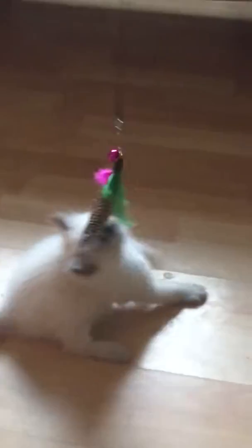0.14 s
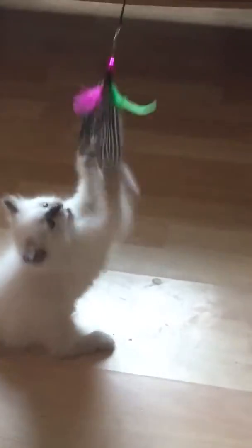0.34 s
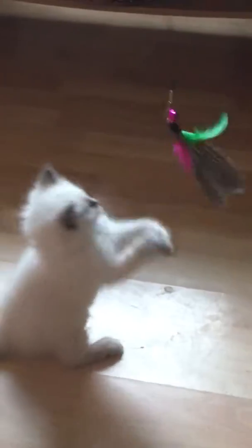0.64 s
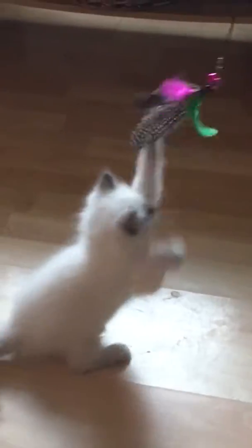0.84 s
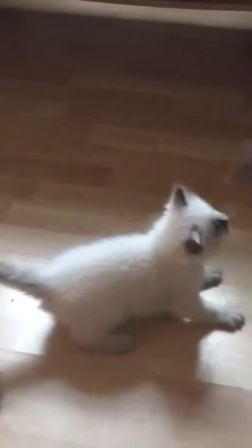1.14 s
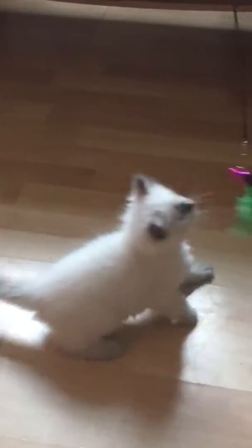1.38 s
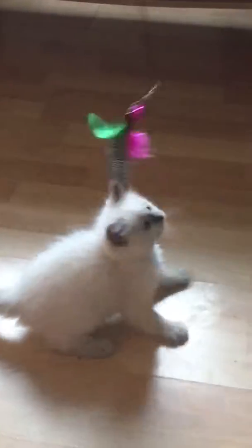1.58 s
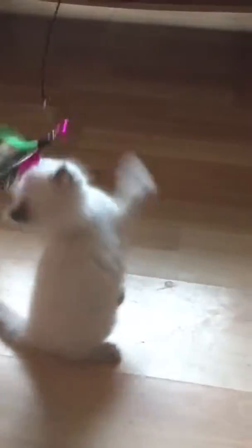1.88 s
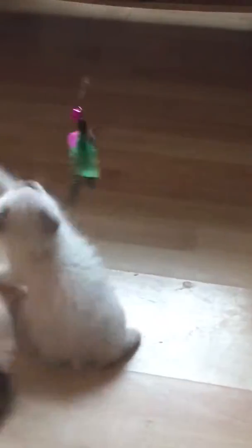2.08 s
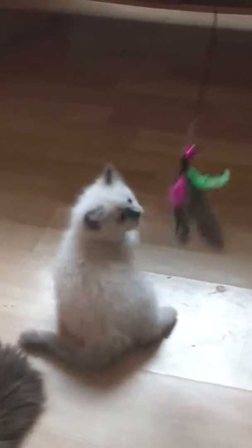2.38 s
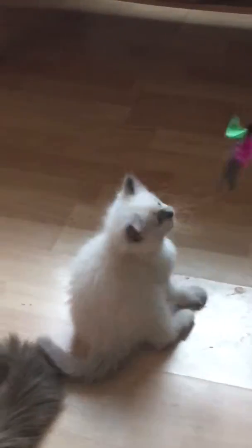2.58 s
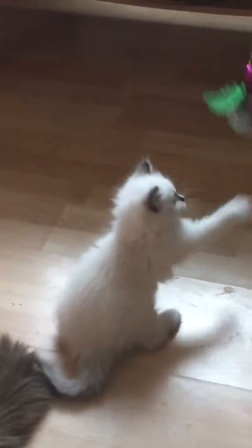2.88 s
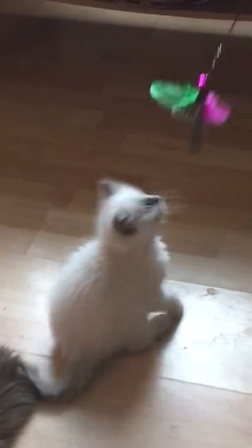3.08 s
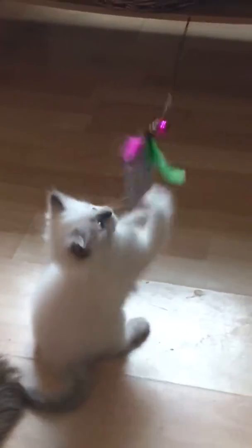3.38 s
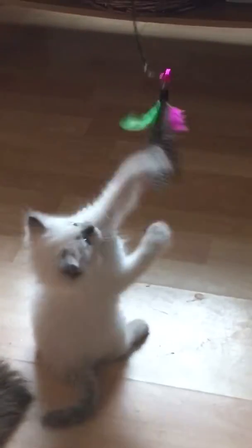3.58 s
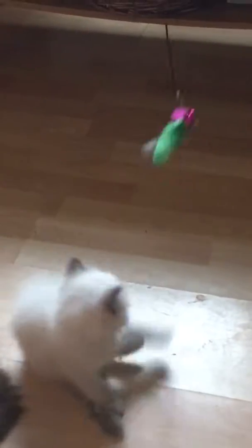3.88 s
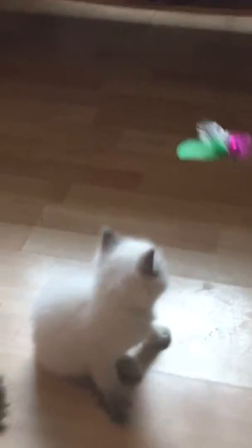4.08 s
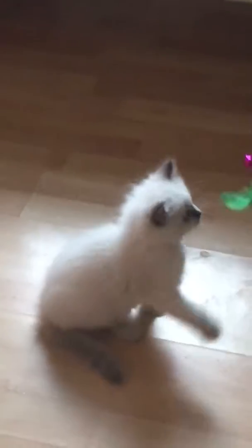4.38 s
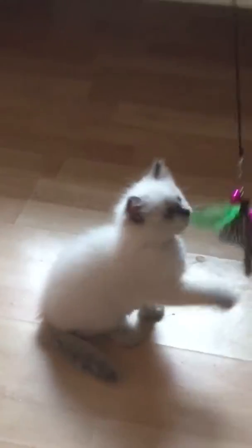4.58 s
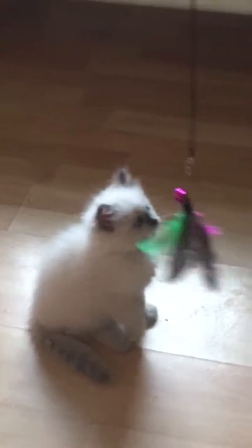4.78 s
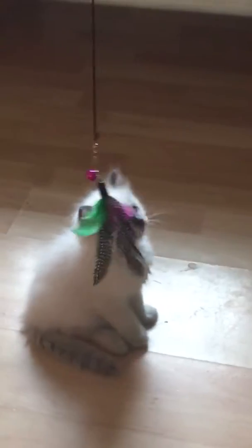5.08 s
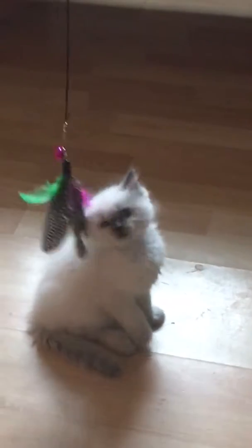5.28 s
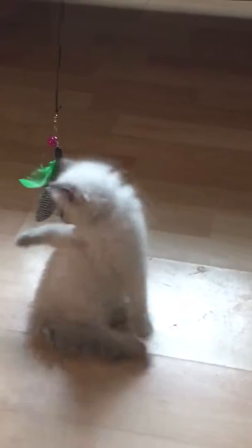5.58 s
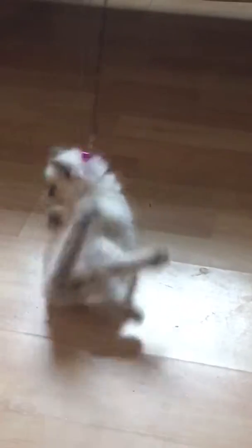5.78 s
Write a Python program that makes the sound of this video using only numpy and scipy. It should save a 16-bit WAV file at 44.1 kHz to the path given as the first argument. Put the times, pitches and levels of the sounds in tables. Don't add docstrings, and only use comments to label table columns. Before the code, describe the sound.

Thin, bright jingles from a small bell toy, feather rustles and paw knocks on a hollow wooden floor, ending in rapid claw tapping.

```python
import sys
import numpy as np
from scipy import signal
from scipy.fft import rfft, irfft, next_fast_len
from scipy.io import wavfile

SR = 44100
rng = np.random.default_rng(int(sys.argv[2]) if len(sys.argv) > 2 else 0)


def wav_out(sig):
    wavfile.write(sys.argv[1], SR, np.round(np.clip(np.atleast_2d(sig).T, -1, 1) * 32767).astype(np.int16))


def invert_db(x):
    u = np.asarray(x, float) / 20
    return 10 ** u


N = 261954

# (frequency [Hz], density [dB per Hz])
AIR_SPECTRUM = [(20, -17.5), (35, -20), (53, 2.5), (75, -6.5), (100, -3), (250, -13.5), (600, -20),
                (1250, -22), (2500, -24), (4000, -26.5), (7500, -32), (12000, -26), (15800, -23.5)]
# (centre [s], half width [s], level [dB])
STIRS = [
    (.36, 0.28, -84),
    (1.2, 0.25, -74.5),
    (2.33, 0.27, -72),
    (3.39, 0.34, -83),
    (4.33, 0.39, -80),
]
# (frequency [Hz], T60 [s])
ROOM_T60 = [(200, 0.24), (1000, 0.33), (5000, 0.35), (8000, 0.24), (15000, 0.17)]
# (frequency [Hz], gain [dB])
MIC_RESPONSE = [(8500, -0.5), (9300, -1.5), (10300, -4.5), (11500, -0.5), (14000, -3), (15700, -1)]
# (time [s], peak [dB], thud re peak [dB], slap re peak [dB], board pitch at the spot [Hz])
PAW_LANDINGS = [(0.407, -40.5, -15.5, -29, 880), (0.418, -62, 8.5, -20, 500), (0.469, -66, 7.5, -20, 500),
                (0.549, -69.5, 11, 6, 509), (0.855, -51.5, -9.5, -7, 530), (1.1653, -31.5, -28, -6, 900),
                (1.171, -41, -19, -21, 595), (1.1828, -28, -30, -19, 600), (1.196, -34, -28, -14, 600),
                (1.211, -47, -30, -22, 560), (1.219, -50, -28, -18, 623), (1.235, -46, -17, -19, 640),
                (1.23, -60.5, 6, 8, 581), (1.25, -57.5, 1, 11, 533), (1.392, -57, 1.5, -7, 546),
                (1.414, -64, 8.5, 7.5, 587), (1.656, -42, -27, -11, 710), (1.66, -40.5, -24, -18, 510),
                (1.666, -45, -12, -11, 740), (1.671, -59, -33, -20, 535), (1.722, -66.5, 8, -6.5, 511),
                (1.735, -75, 9, -20, 500), (1.764, -60, 0, -21.5, 500), (1.786, -44, -11, 0, 815),
                (1.8, -53.5, -4, -10, 600), (1.811, -60.5, 5, -6, 514), (1.823, -60, 1, -20, 500),
                (1.973, -46, -23, -29, 1120), (2.135, -31, -35, -9.5, 630), (2.142, -35, -16, -34, 604),
                (2.145, -32, -24, -19, 670), (2.151, -40, -36, -30, 590), (2.176, -54, -24, -22, 560),
                (2.197, -52, -19, -16, 620), (2.248, -72, 3, -18, 500), (2.268, -48, -29, -7, 700),
                (3.916, -49, -19, -25, 724)]
# (frequency [Hz], level [dB], T60 [s])
BOARD_MODES = [(352, 7.5, 0.039), (530, -1.5, 0.05), (629, -0.5, 0.049), (744, -1, 0.023),
               (930, 0.5, 0.029), (1214, 0, 0.014), (1490, -5, 0.011), (2050, -9, 0.012)]
# (frequency [Hz], level [dB], T60 [s])
THUD_MODES = [(120, -3, 0.028), (210, 3, 0.021), (255, -2, 0.07)]
# (time [s], level [dB])
SCUFFS = [(0.031, -63.5), (0.0658, -52.5), (0.261, -58), (0.321, -58), (0.74, -50.5), (0.882, -55),
          (0.939, -54), (0.943, -55), (1.0369, -50.5), (0.066, -58), (1.105, -52.5), (1.183, -46.5),
          (1.388, -55), (1.567, -56), (1.666, -54), (1.67, -59), (1.747, -56), (1.785, -53), (1.884, -57),
          (2.141, -43), (2.059, -55.5), (2.29, -51), (2.4105, -52.5), (2.84, -51), (2.846, -67),
          (3.257, -59), (3.372, -53.5), (3.657, -61)]
# (time [s], hold [s], level [dB])
SLIDES = [
    (0.4072, 0.0027, -48.5),
    (0.416, .008, -69),
    (0.423, 0.012, -57),
    (0.438, 0.021, -54),
    (0.473, 0.0036, -63),
    (0.481, 0.02, -67),
    (0.504, 0.014, -61.5),
]
# (frequency [Hz], level [dB], T60 [s])
SKID_MODES = [(980, -20, 0.006), (2070, -9.5, 0.015), (2460, 4.5, 0.0058), (3100, 1, 0.002),
              (4540, -9, 0.0033), (5800, -3.5, 0.0021)]
# (time [s], level [dB])
CLAW_TICKS = [(5.292, -40), (5.2974, -48), (5.3144, -44), (5.333, -35.5), (5.359, -40), (5.3644, -45),
              (5.383, -36), (5.4134, -35.5), (5.428, -44), (5.445, -39), (5.461, -41), (5.478, -43),
              (5.4824, -51), (5.5004, -36), (5.5293, -34), (5.5404, -53), (5.553, -36), (5.5923, -43),
              (5.6544, -59), (5.696, -45), (5.7024, -58), (5.7314, -39), (5.7544, -39), (5.784, -31.5),
              (5.8142, -35.5)]
# (time [s], level [dB])
SHAKE = [(0, -75.5), (.21, -81.5), (.56, -69), (.97, -79.5), (1.07, -64), (1.22, -78.5), (1.62, -79),
         (1.8, -65.5), (2.02, -79), (2.17, -66), (2.27, -80), (3.04, -83), (3.34, -73.5), (3.75, -78.5),
         (4.33, -79), (5.1, -84.5), (5.39, -74.5), (5.94, -79.5)]
# (frequency [Hz], level [dB], T60 [s])
LINK_MODES = [(4900, 2, 0.0019), (5300, -2, 0.0036), (6130, 0, 0.0025), (7470, -3.5, 0.0048)]
# (time [s], peak [dB], link clink re peak [dB], tick re peak [dB])
HARD_STRIKES = [(0.581, -34, -29, -14), (0.5866, -42.5, -3, 0.5), (0.74, -33.5, -10.5, 0.5),
                (0.825, -40, -34, -28), (1.047, -40, -27, -28), (1.5665, -39.5, -18, 4),
                (1.7556, -32.5, -20, -3.5), (1.7607, -32, -21, -23), (1.77, -38.5, -10, -8),
                (1.777, -33, -16, -4), (1.795, -33, -23, -20), (1.8475, -23, -22, -13),
                (1.857, -19, -22, -18), (1.8717, -32, -22, -3), (1.9399, -21, -23, -16.5),
                (2.13, -41, -16, -9), (2.301, -38, -27, -12), (2.427, -36.5, -11, -1),
                (2.4388, -24.5, -47, -16), (2.841, -36, -5.5, -0.5), (2.877, -33.5, -16, -10),
                (3.153, -35.5, -20, -14.5), (3.4228, -35, -13, -13), (4.2053, -29, -23, -11.5),
                (4.2325, -29, -10.5, -6.5), (4.2403, -25.5, -41, -36), (4.2653, -26.5, -21, -11.5),
                (4.2946, -21, -22, -13), (4.336, -36, -33, -7), (4.3688, -36.5, -17, -12),
                (4.724, -37, -17, -16)]
# (time [s], peak [dB], clatter re peak [dB], free ring [s])
SOFT_STRIKES = [(0.023, -58, -15, .006), (.4117, -55, -20, 0.032), (0.719, -52, -35, 0.014),
                (1.0384, -43, -11, .008), (1.078, -46, -10, 0.0051), (1.128, -39, -27, 0.0018),
                (1.153, -49, -7, 0.0052), (1.587, -44, -34, 0.0052), (1.635, -45.5, -35, 0.012),
                (1.7843, -33, -27, 0.01), (2.0122, -48, -37, 0.0067), (2.254, -51, -13, 0.0091),
                (2.3258, -40.5, -12, 0.013), (2.363, -44, -15, .005), (3.1036, -44.5, -20, 0.017),
                (3.199, -47, -13, 0.0067), (3.224, -43, -14, 0.0053), (3.4411, -41, -18, 0.002),
                (3.521, -41.5, -11, 0.0043), (3.6538, -43, -14.5, 0.04), (3.7031, -47, -26, 0.083),
                (3.7813, -41.5, -13, 0.0023), (3.848, -49, -22, 0.0072), (4.376, -40, -21, 0.0069),
                (4.6044, -46, -20, 0.026), (4.659, -45.5, -18, 0.0066), (4.744, -44.5, -15, 0.0083),
                (5.1835, -42, -19, 0.0057), (5.899, -62, -17, 0.0065), (5.92, -52, -28, 0.0045)]
# (time [s], peak [dB], upper mode re peak [dB], clatter re peak [dB])
LIP_STRIKES = [(0.1375, -47.5, -4, -7), (0.1919, -36, -4, -15.5), (0.2, -39, -16, -12),
               (0.568, -51, 10, -20), (0.7339, -33, -8, -29), (0.7505, -35, 3, -17), (0.78, -41, 2, -11),
               (0.965, -47.5, 2, -17), (1.092, -44.5, -4, -6), (1.1142, -34, -8, -27),
               (1.139, -37, -12, -28), (1.7475, -31.5, -9, -12), (1.93, -37, -5, -12),
               (2.188, -49.5, -11, -12), (2.615, -53, -12, -7.5), (2.6391, -48.5, -7, -9.5),
               (2.9246, -35.5, -4, -19), (3.244, -49, -11, -7), (3.258, -51, -6, -3.5),
               (3.2709, -37, -6, -12), (3.379, -37, -15, -7), (3.497, -51, -8, -14), (3.538, -37, -8, -21),
               (3.8608, -38, -6, -9), (4.1833, -46.5, -12, -10), (4.272, -49, -11, -25),
               (4.712, -43.5, -2, -18), (5.867, -58, -15, -11), (5.9271, -49, -3, -15)]
# (time [s], peak [dB], link clink re peak [dB], tick re peak [dB])
TUGS = [(0.07, -64, -25, 17), (.245, -56, -5, 9), (0.32, -66, -8, 16), (0.471, -62.5, 0, 18.5),
        (0.51, -60.5, -19, 20.5), (0.554, -53, -6, 4), (0.517, -63, -12, 19), (0.684, -60.5, 7, -1),
        (0.691, -60, -1, 15), (0.8821, -61.5, 9, 17), (0.933, -62, 8, 14), (0.9567, -47.5, -3.5, 6),
        (1.1048, -38, -4, -0.5), (1.167, -57, -18, 13), (1.186, -55, 12, 18), (1.373, -70.5, 8, 15),
        (1.485, -65.5, 3.5, 14.5), (1.553, -58, -1, 4), (2.0599, -53.5, 5, 13), (2.088, -44, 0.5, 13.5),
        (2.097, -58, 1, 4), (2.097, -64, -4, 7), (2.142, -62.5, -11, 19), (2.298, -56, -4, 4),
        (.26, -61, 2, 11), (0.308, -71, 6, -2), (2.264, -53.5, -6, -12), (2.29, -38, -5, 5),
        (2.411, -43.5, -10, 7.5), (2.4205, -51, 2.5, 4), (2.424, -53, -1, 4), (2.434, -49, -10, 5),
        (2.4365, -60, -7, -6), (3.511, -60, -2, 8), (1.353, -73, 9, 4), (2.798, -58, -3, 5),
        (2.817, -63, 7, 9), (3.095, -72, 2, 8), (4.588, -62, 0, -4), (4.256, -58, -7, 14),
        (2.025, -70, -10, 10), (2.828, -68, -8, 10), (3.3632, -51.5, -3, 5), (3.3742, -40.5, -7, 5.5),
        (3.388, -45, -24, -5), (4.485, -65, -3, 14), (5.353, -58.5, -5, -2)]
# (time [s], peak [dB], free ring [s])
REBOUNDS = [(.76, -38, 0.0077), (.775, -48, 0.0035), (.7845, -36, 0.0036), (0.793, -42, .004),
            (.803, -40, 0.0072), (1.068, -42, .012), (1.087, -41, 0.0023), (1.1002, -41, 0.0034),
            (1.1205, -38, .005), (1.1317, -40, .006), (1.853, -34, .003), (1.865, -25, 0.0099),
            (1.879, -37, .004), (1.89, -40, 0.0073), (.965, -30, 0.0033), (2.314, -42, 0.0036),
            (2.335, -43, 0.0044), (2.485, -43, 0.025), (4.245, -34, .006), (4.277, -42, 0.006),
            (4.41, -49, 0.0056), (1.947, -35, .004), (1.956, -47, 0.0022), (2.455, -29.5, 0.004),
            (2.46, -41, 0.0027), (2.466, -41, 0.0034), (2.476, -39, 0.0022), (2.885, -37, .004),
            (2.902, -50, 0.0059), (3.386, -35, .002), (3.393, -47, 0.0016), (3.415, -42, 0.0044),
            (3.435, -40, 0.0023), (3.451, -47, 0.021), (3.546, -47, 0.0023), (4.218, -41, 0.0039),
            (4.255, -35, 0.0032), (4.304, -30, 0.0034), (4.31, -38, 0.0033), (4.32, -39, 0.0044),
            (4.329, -42, 0.0034)]
# (time [s], free ring [s])
FLIGHTS = [(.741, 0.011), (.7502, 0.009), (1.047, 0.02), (1.1146, .002), (1.127, .002), (1.139, 0.0038),
           (1.5666, .058), (1.794, 0.006), (1.8479, 0.0033), (1.8575, 0.0043), (1.8722, .004),
           (1.94, 0.0057), (2.427, 0.0018), (2.4388, 0.015), (2.841, 0.015), (2.8773, 0.0057),
           (2.9256, 0.014), (3.153, 0.0071), (3.2728, 0.036), (3.379, 0.0025), (3.538, 0.0045),
           (4.183, 0.01), (4.2053, .004), (4.2396, 0.005), (4.2648, 0.01), (4.2942, 0.007), (4.336, .005),
           (4.368, .006), (.192, 0.0036), (2.13, .015), (4.712, .012), (4.724, 0.01)]
# (time [s], frequency [Hz])
BELL_PITCH = [(.14, 7500), (.19, 7570), (.73, 7515), (.97, 7470), (1.05, 7518), (1.6, 7518), (1.79, 7478),
              (1.85, 7412), (1.94, 7462), (2.13, 7470), (2.33, 7588), (2.44, 7490), (2.64, 7590),
              (2.84, 7478), (2.93, 7572), (3.1, 7513), (4.23, 7465), (4.6, 7535)]
# (peak [dB], T60 [s])
FREE_T60 = [(-44, .22), (-34, .1), (-24, .06)]

AIR_DB, STILL_DB = -67, -83
BAND_LIMIT_HZ = 16000
FEET_WET_DB, RING_WET_DB = -5.5, -10
BITE_DB, BITE_S, SLIDE_FADE_DB_PER_S = 0.5, 0.0026, 900
ROLL_DB, ROLL_SETTLE_S, ROLL_FOLLOWS = -39, 0.018, 0.73
SHIVER_DB, SHIVER_S = -77.5, 0.026
JANGLE_DB, JANGLE_S, LINK_SPREAD_DB = -6, 0.0048, 3
LINK_DB, TICK_DB = 1, 8
HARD_UPPER_DB, SOFT_UPPER_DB, TUG_UPPER_DB = -30, -14, -3
FREE_RING_S, LIP_RING_S, RING_SPREAD = 0.0073, 0.0096, 0.042
DAMPED_DB, CARRIED_DB, SETTLE_S = -8.5, -13, 0.0007
SPLIT_HZ, SPLIT_DB = 48, -19.5
BELL_UPPER_HZ, UPPER_T60_S, BELL_T60_S = 8140, 0.15, 0.11


def rms_one(x):
    return x / np.sqrt(np.mean(x ** 2) + 1e-20)


def in_time(rows):
    s, *columns = np.transpose(rows)
    return [np.interp(np.arange(N) / SR, s, c) for c in columns]


def at_hz(points, hz):
    table_hz, values = np.transpose(points)
    return np.interp(np.log(hz + 1), np.log(table_hz), values)


def band(x, low_hz, high_hz):
    sos = signal.butter(2, [low_hz, min(high_hz, .45 * SR)], "band", fs=SR, output="sos")
    return signal.sosfilt(sos, x + 1e-18)


def linger(x, decay_s):
    return signal.lfilter([1], [1, -np.exp(-1 / (decay_s * SR))], x + 1e-18)


def ring(clicks, modes):
    out = 0
    for hz, db, t60_s in modes:
        r, w = invert_db(-60 / (t60_s * SR)), 2 * np.pi * hz / SR
        out = out + invert_db(db) * signal.lfilter([0, np.sin(w)], [1, -2 * r * np.cos(w), r * r], clicks + 1e-18)
    return out


def blows(times_s, db):
    out = np.zeros(N)
    at = np.round(np.asarray(times_s) * SR).astype(int)
    np.add.at(out, np.minimum(at, N - 1), invert_db(db))
    return out


def grains(per_s, spread_db):
    sizes = invert_db(spread_db * np.minimum(rng.exponential(1, N), 5))
    return sizes * rng.choice([-1, 1], N) * (rng.random(N) < per_s / SR)


def puff(clicks, low_hz, high_hz, decay_s):
    return linger(np.abs(clicks), decay_s) * rms_one(band(rng.standard_normal(N), low_hz, high_hz))


def drift(rate_hz):
    r = np.exp(-2 * np.pi * rate_hz / SR)
    return rms_one(signal.lfilter([1], [1, -2 * r, r * r], rng.standard_normal(N + SR))[SR:])


def air():
    hz = np.arange(N // 2 + 1) * SR / N
    noise = irfft(rfft(rng.standard_normal(N)) * invert_db(at_hz(AIR_SPECTRUM, hz)), N)
    return invert_db(AIR_DB) * rms_one(noise)


def stirring():
    t = np.arange(N) / SR
    swell = invert_db(STILL_DB) + sum(invert_db(db) * np.exp(-((t - s) / half_s) ** 2) for s, half_s, db in STIRS)
    low = rms_one(band(rng.standard_normal(N), 140, 304)) * invert_db(2.2 * drift(2.3))
    rumble = rms_one(band(rng.standard_normal(N), 35, 114)) * invert_db(-78.5 + 5.0 * drift(2.14))
    house_air = rms_one(band(rng.standard_normal(N), 260, 650))
    return rumble + swell * (invert_db(2.5) * low + invert_db(-2.5) * house_air)


def room(x):
    t, tail = np.arange(SR // 2) / SR, 0
    for hz in 125 * 2. ** np.arange(8):
        noise = band(rng.standard_normal(len(t)), hz / 2 ** .5, hz * 2 ** .5)
        tail = tail + noise * invert_db(-60 * t / at_hz(ROOM_T60, hz))
    tail = tail * np.clip((t - .004) / 0.00019, 0, 1)
    tail = tail / np.sqrt(np.sum(tail ** 2))
    size = next_fast_len(N + len(t))
    return irfft(rfft(x, size) * rfft(tail, size), size)[:N]


def paws():
    s, db, thud_db, slap_db, spot_hz = np.transpose(PAW_LANDINGS)
    board = 0
    for k, mode in enumerate(BOARD_MODES):
        near_db = -24 * np.log2(mode[0] / spot_hz) ** 2
        board = board + (-1) ** k * ring(blows(s - .001, db - 8.5 + near_db), [mode])
    thud = ring(band(blows(s - .001, db + thud_db + 2.0), 90, 530), THUD_MODES)
    slaps = puff(blows(s, db + slap_db - 4.0), 690, 2100, 0.0022)
    catches = blows(*np.transpose(SCUFFS))
    scuffs = invert_db(-1.5) * puff(catches, 1080, 7200, 0.0041) + invert_db(21.5) * band(catches, 2000, 4500)
    return band(board, 380, 3600) + thud + slaps + scuffs


def claw_skid():
    t, press = np.arange(N) / SR, 0
    for s, hold_s, db in SLIDES:
        age_s = np.maximum(t - s, 0)
        bite_db = BITE_DB * np.exp(-age_s / BITE_S)
        fade_db = SLIDE_FADE_DB_PER_S * np.maximum(age_s - hold_s, 0)
        press = press + (t > s) * invert_db(db + bite_db - fade_db)
    return press * rms_one(ring(grains(5000, 1.8), SKID_MODES))


def claw_ticks():
    s, db = np.transpose(CLAW_TICKS)
    taps = blows(s + .001, db)
    sharp = band(band(taps, 12000, 21000), 8600, 17000)
    return invert_db(12.5) * sharp + invert_db(-1.0) * band(taps, 3800, 7200)


def flight(s, usual_s):
    return next((free_s for at_s, free_s in FLIGHTS if abs(at_s - s) < .0045), usual_s)


def strikes():
    rows = [(s, db, link_db, HARD_UPPER_DB, tick_db, flight(s, FREE_RING_S))
            for s, db, link_db, tick_db in HARD_STRIKES]
    rows += [(s, db, clatter_db + LINK_DB, SOFT_UPPER_DB, clatter_db + TICK_DB, free_s)
             for s, db, clatter_db, free_s in SOFT_STRIKES]
    rows += [(s, db, clatter_db + LINK_DB, upper_db, clatter_db + TICK_DB, flight(s, LIP_RING_S))
             for s, db, upper_db, clatter_db in LIP_STRIKES]
    rows += [(s, db, link_db, TUG_UPPER_DB, tick_db, FREE_RING_S) for s, db, link_db, tick_db in TUGS]
    rows += [(s, db, -40, SOFT_UPPER_DB, -30, free_s) for s, db, free_s in REBOUNDS]
    return sorted(rows)


def rattle():
    shake_db, = in_time(SHAKE)
    s, db = np.transpose(strikes())[:2]
    energy = linger(blows(s, db + 30) ** 2, ROLL_SETTLE_S)
    shell = [(7480, 0, .045), (7560, -5, .04), (BELL_UPPER_HZ, -11, .04)]   # (Hz, dB, T60 s)
    roll = energy ** (ROLL_FOLLOWS / 2) * rms_one(ring(grains(400, 0.77), shell))
    shiver = invert_db(SHIVER_DB) * np.sqrt(linger(blows(s, db + 30), SHIVER_S))
    crackle = grains(5400, 3.5)
    high = rms_one(band(crackle, 8000, 16100))
    low = rms_one(band(band(crackle, 5700, 7400), 4200, 7000))
    rustle = (invert_db(shake_db + 5.0) + shiver) * high + invert_db(shake_db - 2.5) * low
    return invert_db(ROLL_DB - 12.5) * roll + rustle


def small_shell(x):
    return signal.sosfilt(signal.butter(5, 4500, "high", fs=SR, output="sos"), x)


def bell_clatter():
    s, db, link_db, _, tick_db, _ = np.transpose(strikes())
    links, ticks = blows(s, db + link_db), blows(s, db + tick_db)
    jangle = ring(linger(links, JANGLE_S) * grains(700, 2.0), LINK_MODES)
    uneven_db = LINK_SPREAD_DB * rng.standard_normal((len(s), len(LINK_MODES)))
    struck = 0
    for k, mode in enumerate(LINK_MODES):
        struck = struck + ring(blows(s, db + link_db + uneven_db[:, k]), [mode])
    clink = invert_db(4.5) * struck + invert_db(JANGLE_DB) * jangle + invert_db(-1.5) * puff(links, 5150, 7400, 0.0038)
    tick = invert_db(-1.0) * puff(ticks, 8100, 20000, 0.0024) + invert_db(16.0) * band(ticks, 6000, 17000)
    return small_shell(clink + tick)


def bell_tone():
    out, t = np.zeros(N + SR), np.arange(SR // 6) / SR
    rise = np.minimum(t / .0005, 1)
    for s, db, _, upper_db, _, free_s in strikes():
        fall_chance, jump_chance, twin_phase = rng.random(3)
        fall_s = free_s * (1 + RING_SPREAD * (fall_chance - .5))
        touch = np.clip((t - fall_s) / SETTLE_S, 0, 1)
        lying_s = np.maximum(t - free_s, 0)
        free_t60_s = np.interp(db, *np.transpose(FREE_T60))
        decay_db = -60 * (t - lying_s) / free_t60_s - 60 * lying_s / BELL_T60_S
        shape = invert_db(decay_db + DAMPED_DB * touch) * rise

        jump = np.pi * (jump_chance - .5) * touch
        hz = np.interp(s, *np.transpose(BELL_PITCH))
        twin_hz = hz + SPLIT_HZ * np.sign(7500 - hz)
        main = np.sin(2 * np.pi * hz * t + jump)
        twin = invert_db(SPLIT_DB) * np.sin(2 * np.pi * (twin_hz * t + twin_phase))
        upper = invert_db(upper_db - 60 * t / UPPER_T60_S) * np.sin(2 * np.pi * BELL_UPPER_HZ * t - jump)

        at = round(s * SR)
        old_peak = np.abs(out[at:at + 12]).max()
        weight = min(1, 2 * invert_db(db) / (old_peak + 1e-9))
        out[at:at + len(t)] *= invert_db(CARRIED_DB * weight * rise)
        out[at:at + len(t)] += invert_db(db - 3.5) * shape * (main + twin + upper)
    return small_shell(out[:N])


def scene():
    feet, skid, ticks = paws(), claw_skid(), claw_ticks()
    clatter, tone = bell_clatter(), bell_tone()
    near = feet + skid + ticks + clatter + tone + rattle()
    wet = invert_db(FEET_WET_DB) * feet + invert_db(-10.0) * skid + invert_db(-7.0) * ticks
    wet = wet + invert_db(-4.0) * clatter + invert_db(RING_WET_DB) * tone
    return (near + room(wet) + air() + stirring())[None]


def band_limit(x):
    return signal.sosfilt(signal.butter(12, 16980, fs=SR, output="sos"), x)


def record(dry):
    hz = np.arange(N // 2 + 1) * SR / N
    limit_db = -28 * np.clip((hz - BAND_LIMIT_HZ) / 150 + .5, 0, 1) - 60 * (hz > 16800)
    mix = irfft(rfft(dry) * invert_db(at_hz(MIC_RESPONSE, hz) + limit_db), N)
    return band_limit(mix)


dry = scene()
out = record(dry)
wav_out(out)
```